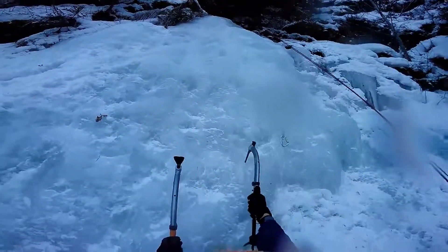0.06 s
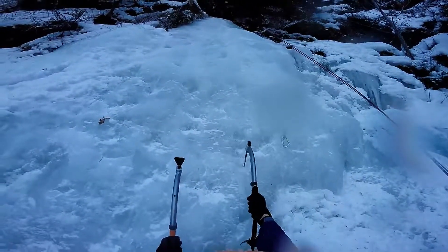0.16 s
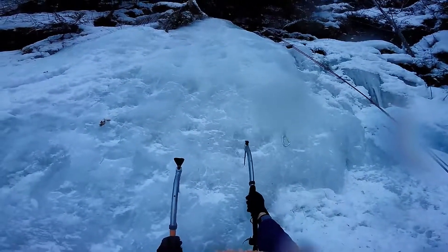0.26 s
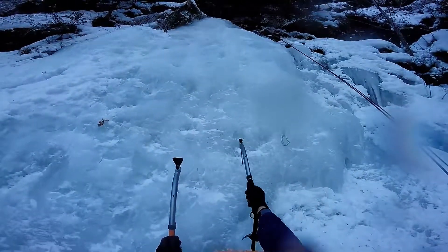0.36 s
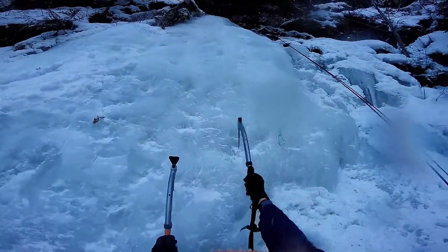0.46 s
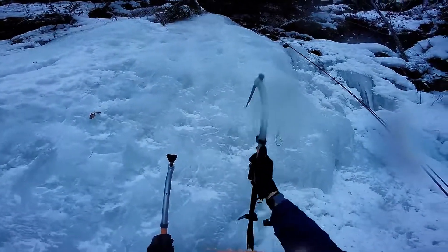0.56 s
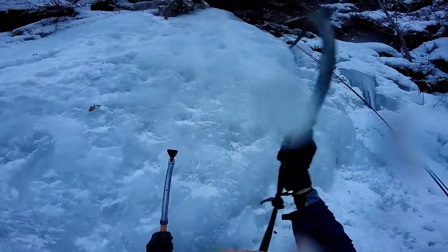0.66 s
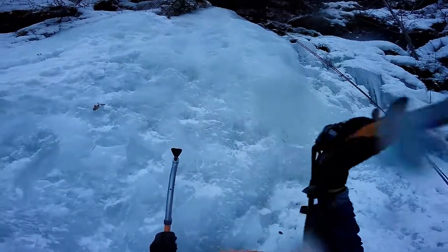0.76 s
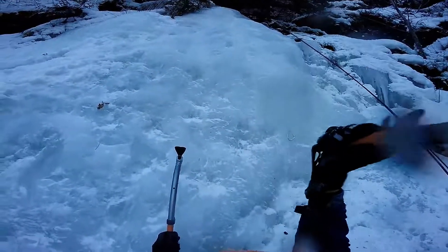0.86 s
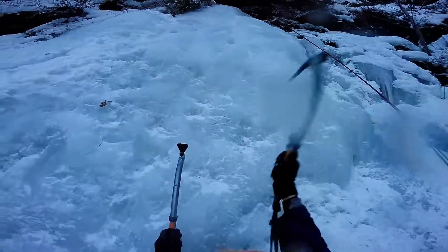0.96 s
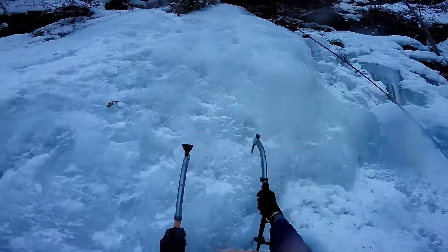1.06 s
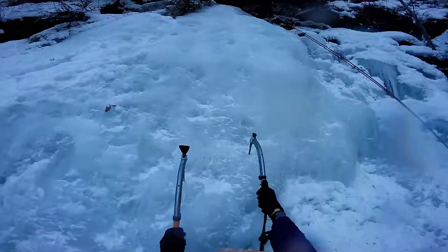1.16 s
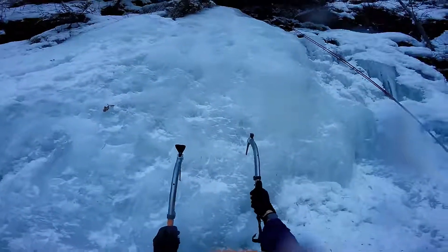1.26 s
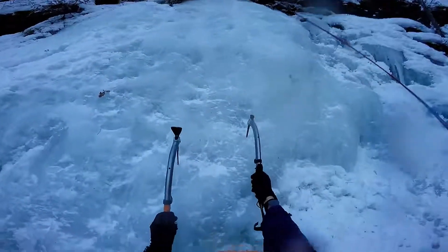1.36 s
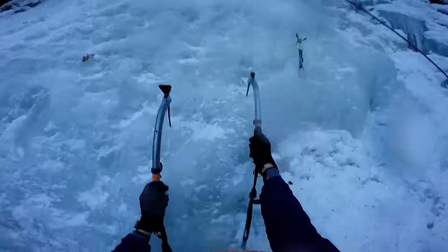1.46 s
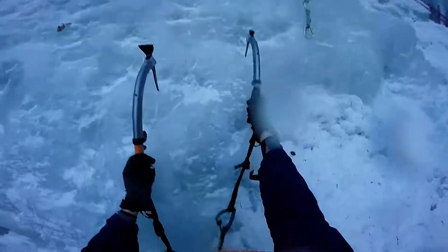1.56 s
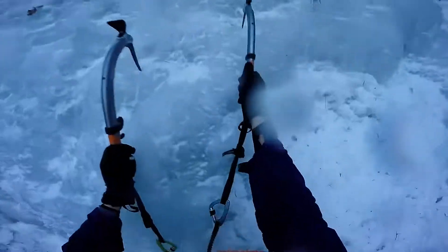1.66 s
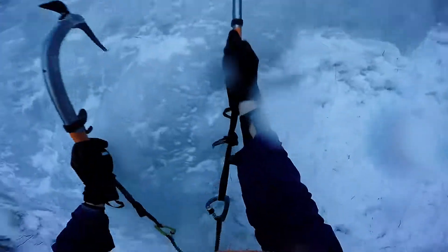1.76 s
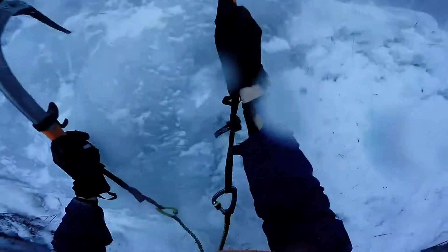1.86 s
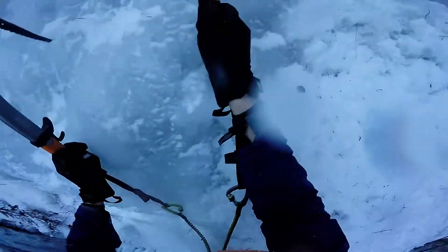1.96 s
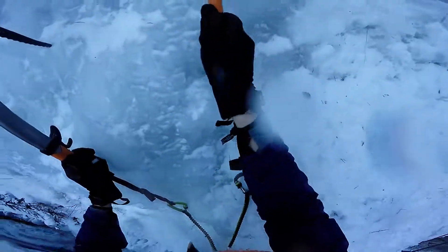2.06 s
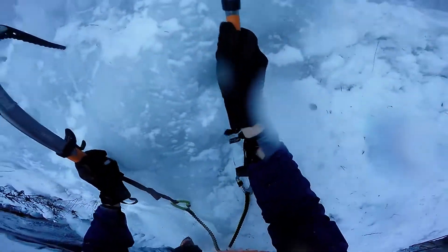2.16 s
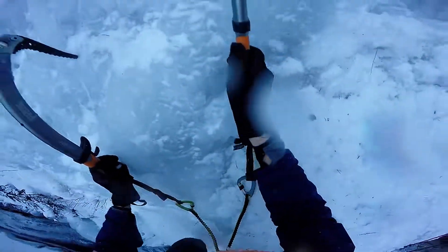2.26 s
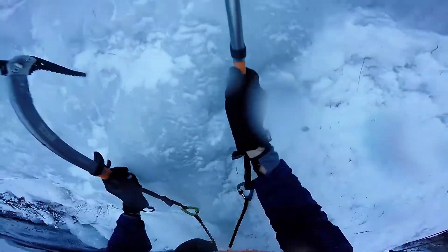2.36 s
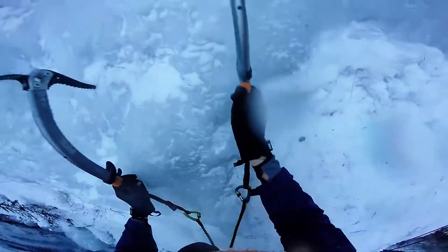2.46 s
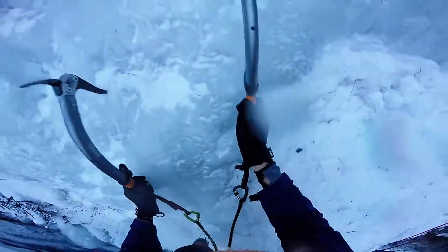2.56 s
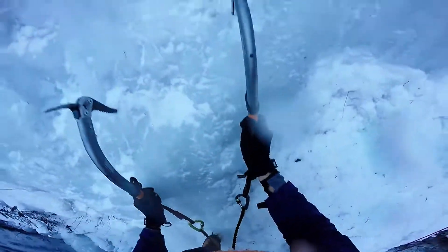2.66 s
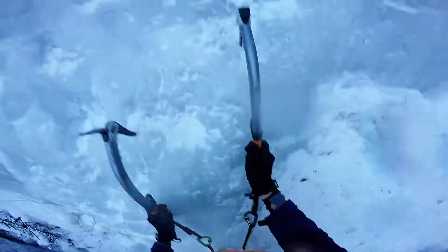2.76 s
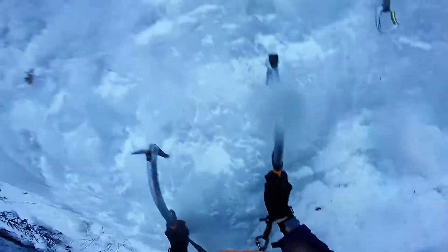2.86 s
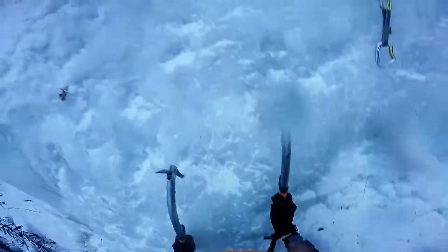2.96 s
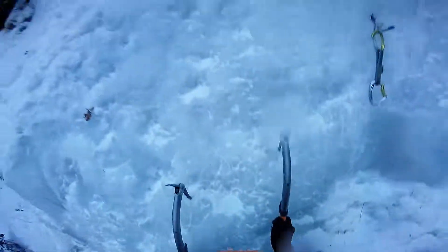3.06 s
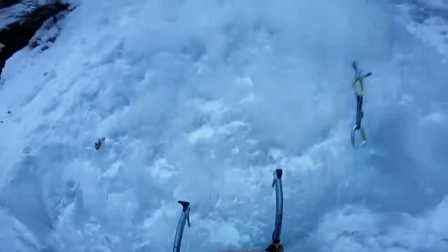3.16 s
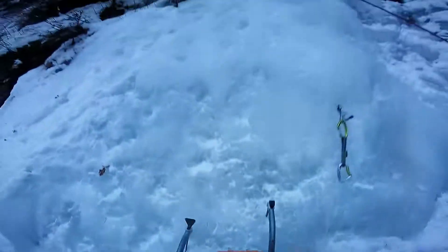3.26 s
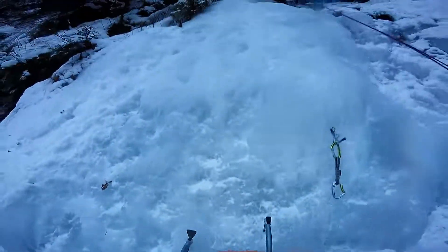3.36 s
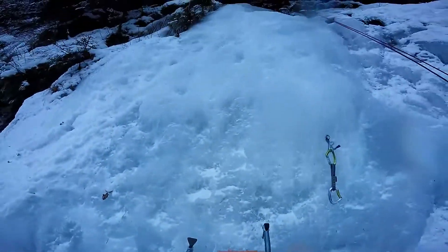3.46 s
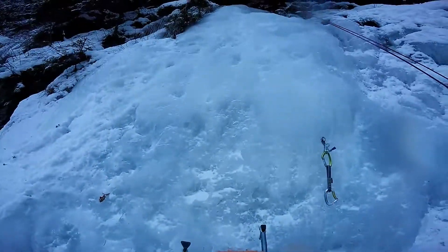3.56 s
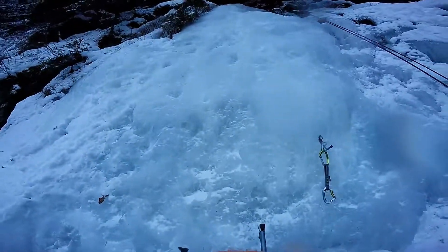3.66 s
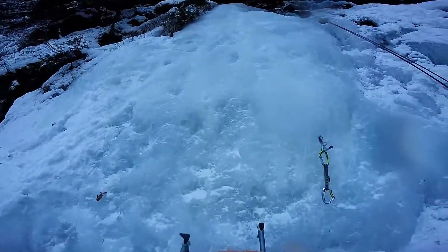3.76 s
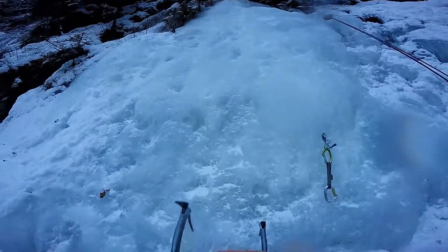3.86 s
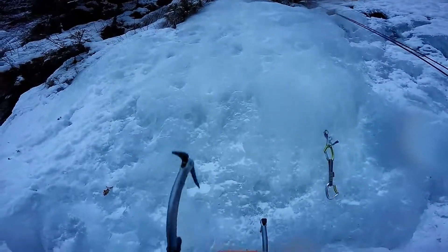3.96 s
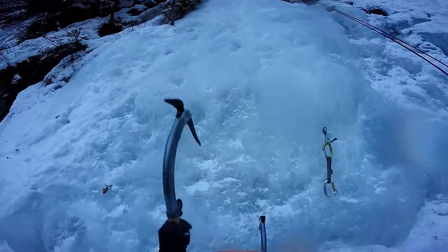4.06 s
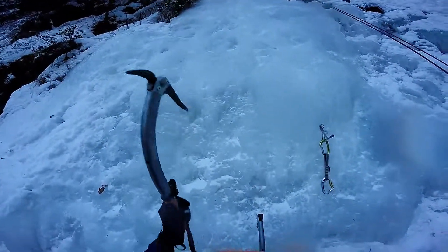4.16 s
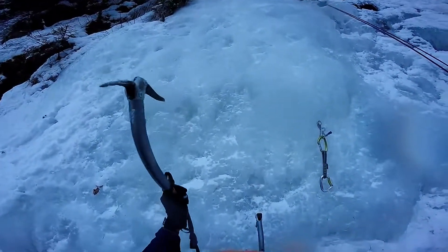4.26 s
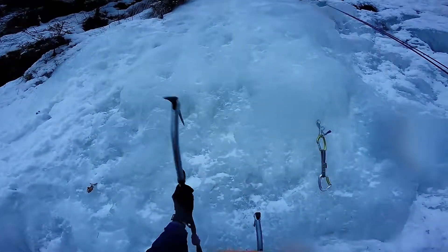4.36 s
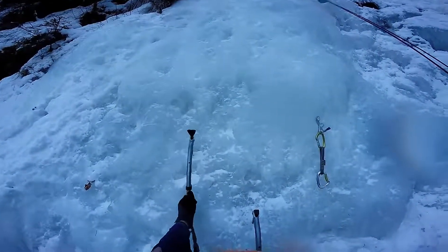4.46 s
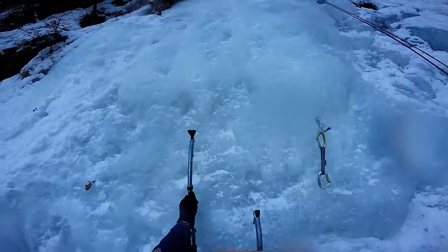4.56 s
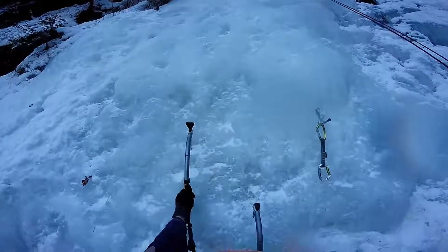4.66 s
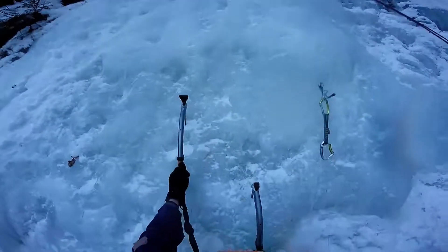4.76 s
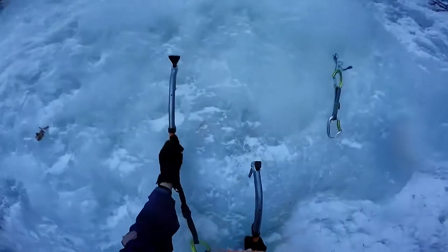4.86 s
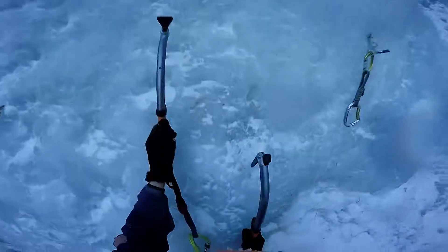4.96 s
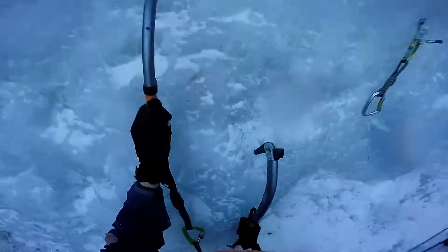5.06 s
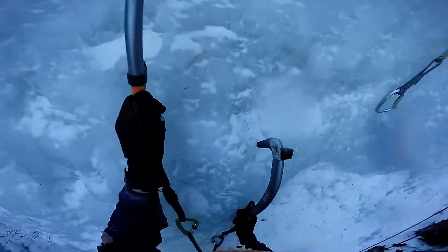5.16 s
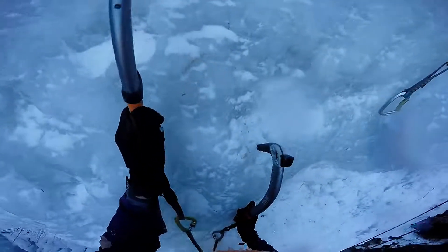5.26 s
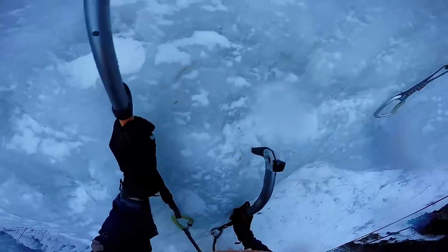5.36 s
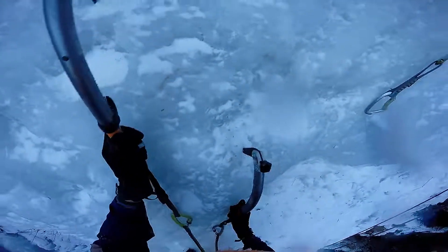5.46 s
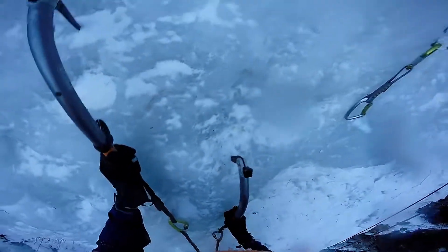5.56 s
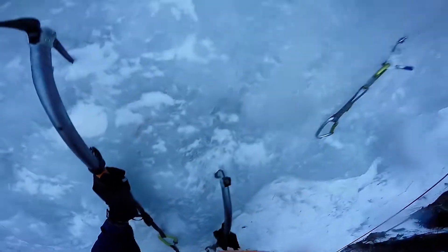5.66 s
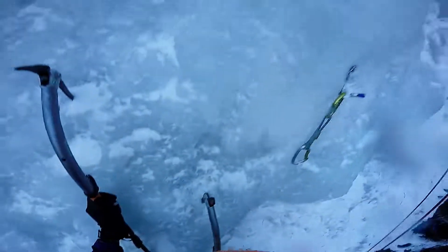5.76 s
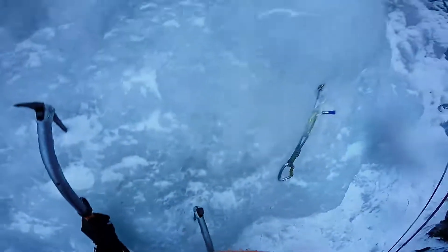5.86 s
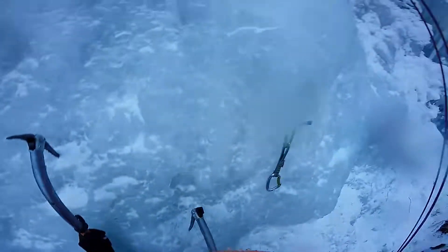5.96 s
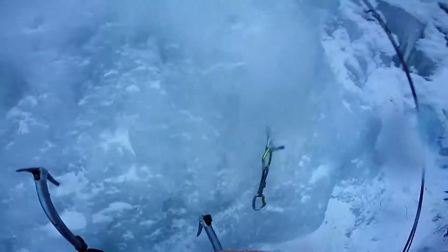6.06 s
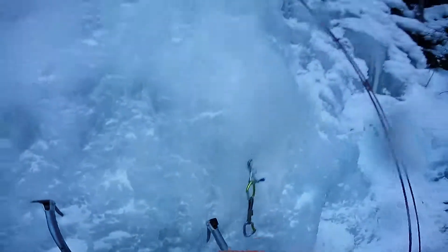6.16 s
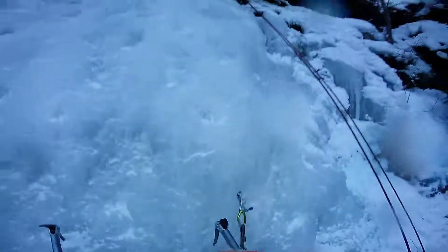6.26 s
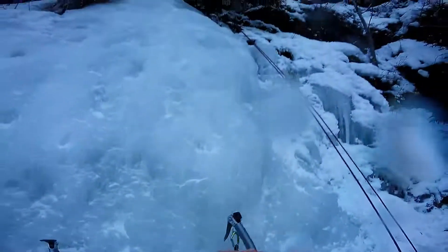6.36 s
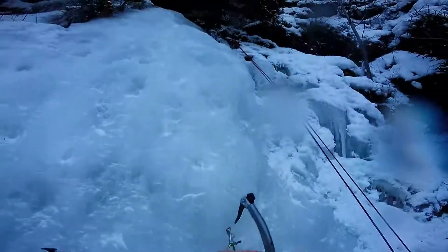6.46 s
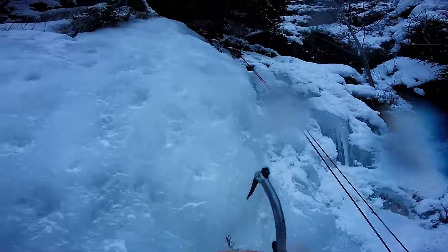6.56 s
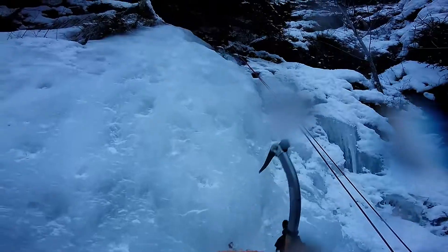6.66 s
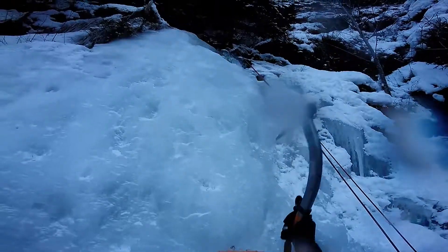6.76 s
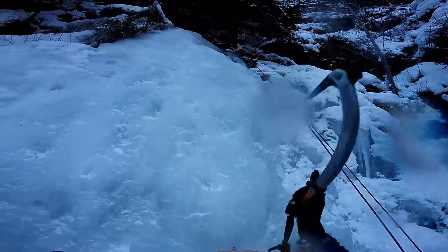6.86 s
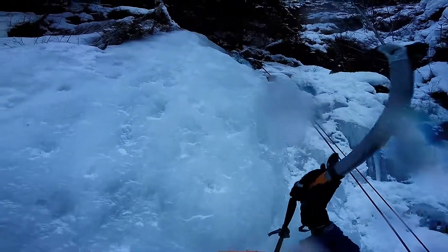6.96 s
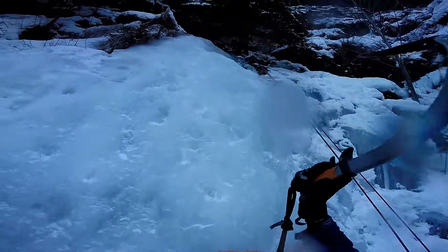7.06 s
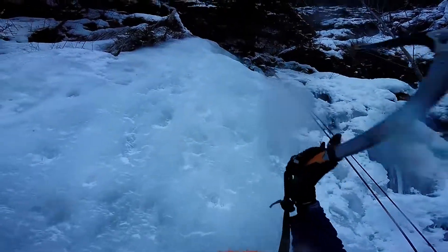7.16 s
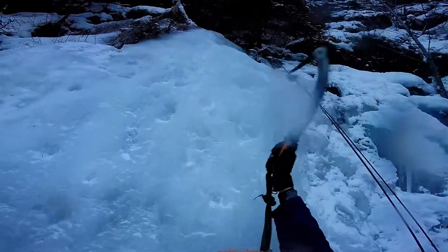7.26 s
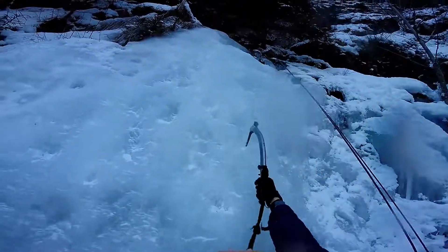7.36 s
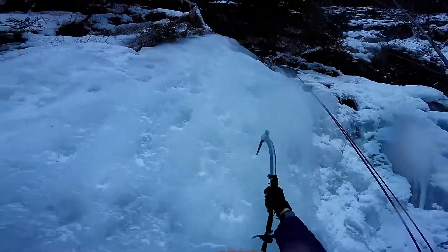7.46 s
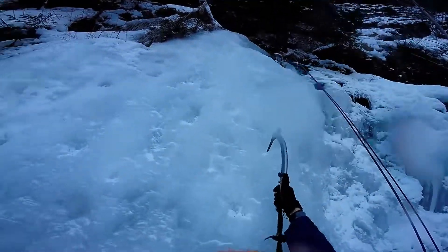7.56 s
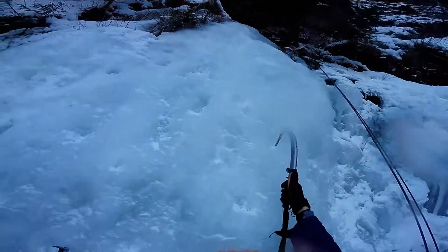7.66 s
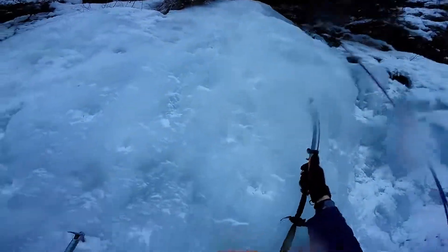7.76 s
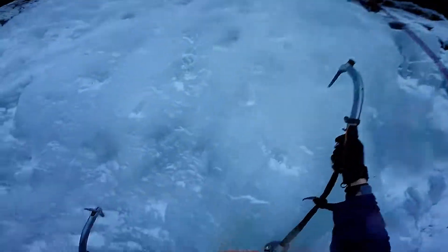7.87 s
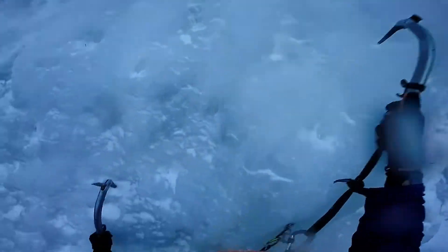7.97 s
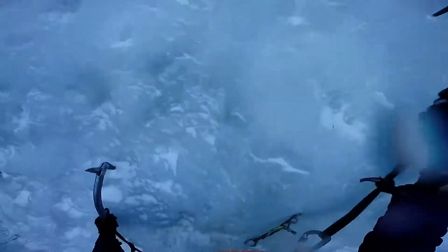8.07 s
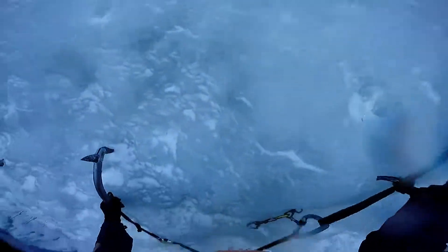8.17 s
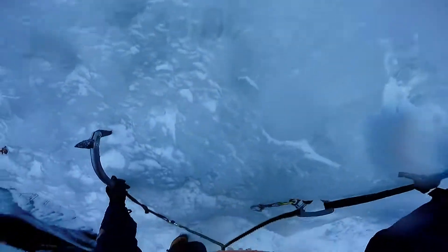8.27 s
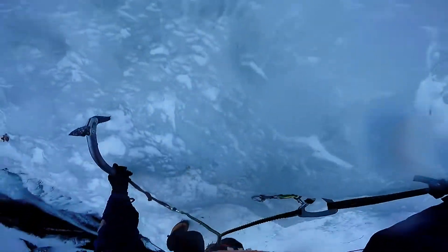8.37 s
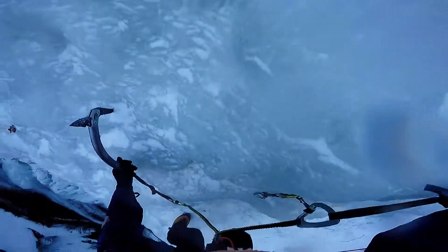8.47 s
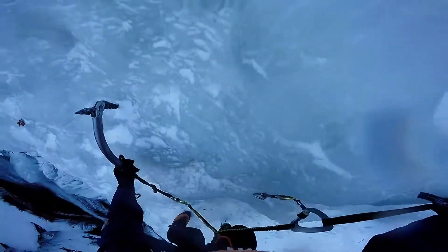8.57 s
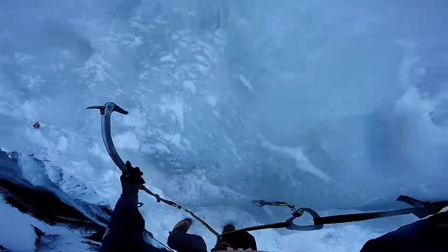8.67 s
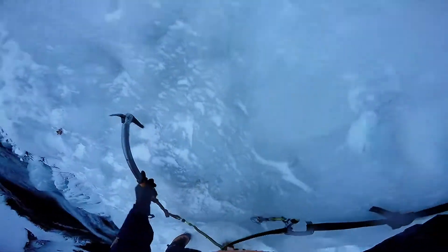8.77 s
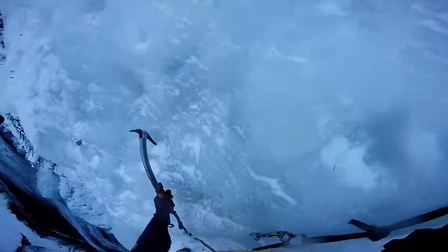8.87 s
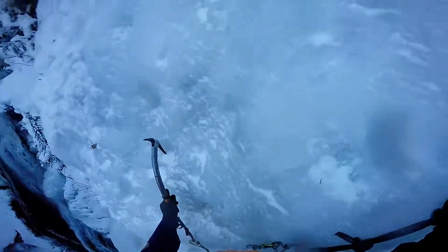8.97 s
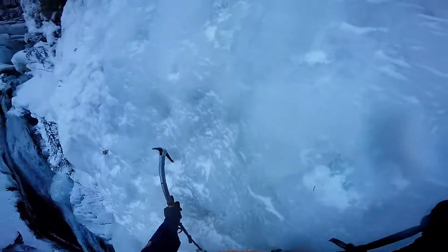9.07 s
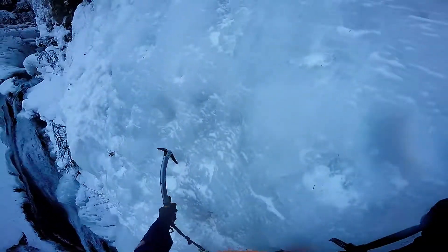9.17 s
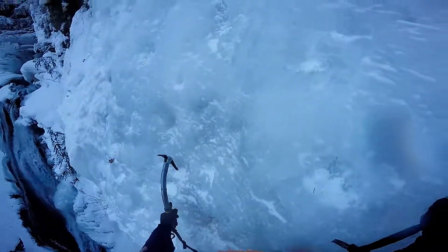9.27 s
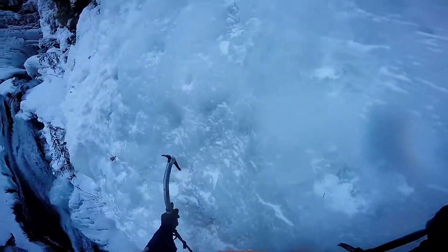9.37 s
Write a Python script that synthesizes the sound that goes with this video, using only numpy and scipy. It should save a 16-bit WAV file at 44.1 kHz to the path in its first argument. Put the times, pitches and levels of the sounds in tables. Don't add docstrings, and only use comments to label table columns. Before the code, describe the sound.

Close, crunchy pick strikes on a frozen waterfall, with a constant muffled hiss, deep body thumps, dull helmet knocks and brief metallic clinks.

```python
import sys
import numpy as np
from scipy import signal
from scipy.fft import rfft, irfft, next_fast_len
from scipy.io import wavfile
from scipy.ndimage import uniform_filter1d, map_coordinates

SR = 44100
rng = np.random.default_rng(int(sys.argv[2]) if len(sys.argv) > 2 else 0)


def inscribe(sig):
    pcm = np.round(np.clip(np.atleast_2d(sig).T, -1, 1) * 32767)
    wavfile.write(sys.argv[1], SR, pcm.astype(np.int16))


def nominal_scale(level):
    x = np.asarray(level, float) / 20
    return 10 ** x


N = 414981


def unit(x):
    return x / np.sqrt(np.mean(x ** 2) + 1e-20)


def along(points, hz):
    f, value = np.transpose(points)
    return np.interp(np.log(hz + 1), np.log(f + 1), value)


def curves(rows):
    times, *columns = np.transpose(rows)
    return [np.interp(np.arange(N) / SR, times, column) for column in columns]


def wobble(rate):
    knots = rng.standard_normal(int(N * rate / SR) + 4)
    return map_coordinates(knots, [np.arange(N) * rate / SR])


def filtered(x, response):
    size = next_fast_len(len(x) + 8192)
    spectrum = rfft(x, size) * response(np.fft.rfftfreq(size, 1 / SR))
    return irfft(spectrum, size)[:len(x)]


def resonances(modes):
    def response(f):
        total = 0
        for k, (hz, width, db) in enumerate(modes):
            damping = 1j * f * width
            total = total + (-1) ** k * nominal_scale(db) * damping / (hz * hz - f * f + damping)
        return total
    return response


def rush(spectrum, patchy_db=0):
    x = rng.standard_normal(N)
    if patchy_db > 0:
        field = rng.standard_normal((257, N // 256 + 2))
        field = uniform_filter1d(field, size=6, axis=0)
        field = uniform_filter1d(field, size=10, axis=1)
        patches = signal.stft(x, nperseg=512)[2] * nominal_scale(patchy_db * unit(field))
        x = signal.istft(patches, nperseg=512)[1][:N]
    return unit(filtered(x, lambda hz: nominal_scale(along(spectrum, hz))))


def steady(x, span):
    size = int(span * SR)
    power = uniform_filter1d(uniform_filter1d(x * x, size), size)
    return x / np.sqrt(np.abs(power) + 0.024)


def burst(modes, rise, hold, t60, spiky, in_step=0):
    size = 4096 if rise + hold + t60 < 0.06 else 16384
    t, f = np.arange(size) / SR, np.fft.rfftfreq(size, 1 / SR)
    attack = np.clip(t / max(rise, 1e-4), 0, 1) ** 2
    shape = attack * nominal_scale(-60 * np.clip(t - rise - hold, 0, None) / t60)
    cracks = rfft(shape * rng.standard_normal(size) * nominal_scale(spiky * rng.standard_normal(size)))
    total = 0
    for k, (hz, width, db) in enumerate(modes):
        force = cracks
        if in_step and width < 600:
            swing = rfft(shape * np.sin(2 * np.pi * hz * t))
            force = cracks + in_step * np.sqrt(width / SR) * swing
        ring = force * resonances([(hz, 1.8 * width, 0)])(f) ** 2
        total = total + (-1) ** k * nominal_scale(db) * np.sqrt(width) * ring / np.linalg.norm(ring)
    x = irfft(total, size)
    return 0.41 * x / np.linalg.norm(x) * np.sqrt(np.sum(shape ** 2) + 0.0012 * SR)


def add(track, s, x):
    start = round(s * SR)
    start, x = max(start, 0), x[max(-start, 0):]
    track[start:start + len(x)] += x[:len(track) - start]


# (time [s], tilt [0 up - 1 down], turn [-1 left - 1 right], faces water [0-1])
HEAD_AIM = [(0, 0.0089, 0.14, 1), (1.3, 0.04, 0.11, 0.8), (1.6, 0.07, 0, 0.6), (1.95, 0.87, 0.18, 0.58),
            (2.4, 1, 0.13, 0.97), (3.0, 0.97, 0.12, 0.6), (3.4, 0, -0.43, 0.26), (4.7, 0.027, -0.5, 0.05),
            (5.1, 0.59, 0.068, 0.37), (5.6, 1, -0.52, 0.3), (5.95, 0.43, 0, 0), (6.3, 0.016, .7, 0.4),
            (6.7, 0.083, 1, 0.78), (7.55, 0.019, 0.88, 0.93), (8.0, 0, -0.13, 0.7),
            (8.35, 0.95, 0.052, 0.82), (8.9, 0.71, -0.73, 0.93), (9.41, 0.88, -0.93, 0.84)]
# (frequency [Hz], level [dB per Hz])
LOW_HISS = [(60, -72), (90, -5.5), (140, -12.5), (340, -19.5), (750, -19), (1100, -10)]
HEAD_UP_HISS = [(1500, -4.5), (1700, -5.5), (1950, 1.85), (2350, -7), (2650, -4), (3200, -8), (3900, -8),
                (4800, -14.5), (5400, -13.5), (6200, -19), (8100, -16.5), (8800, -20), (10900, -24),
                (11500, -26.5), (15300, -31.5)]
HEAD_DOWN_HISS = [(1500, -5), (2000, -5), (2400, -5), (2800, -2.5), (3400, -11.5), (3900, -11),
                  (4300, -13.5), (5200, -12), (6100, -20), (7600, -13), (8100, -13.5), (8700, -22.5),
                  (10500, -24), (15300, -33)]
# (frequency [Hz], width [Hz], level [dB])
HOUSING_AIR = [(512, 31, 7), (12700, 1200, 2), (14300, 540, 5)]
# (frequency [Hz], level [dB])
TURNED_RIGHT = [(1500, 0), (3000, 0), (4800, -1.5), (6500, 0), (8900, -2), (9800, 1.5), (11500, -2),
                (14300, -2)]
TURNED_LEFT = [(1500, -1), (3000, -0.5), (5500, 2), (7000, 2.5), (9500, -4), (11000, 2), (13000, -1.5),
               (14500, 1.5)]
FACING_AWAY = [(1500, -0.5), (4300, 0.34), (5200, -2.5), (8100, -2), (8900, 2.5), (10000, 1), (11500, -0.8),
               (13500, 2), (15000, 1.5)]


def stream():
    down, turn, facing = curves(HEAD_AIM)
    right, left = np.clip(turn, 0, 1), np.clip(-turn, 0, 1)

    up_hiss = rush(LOW_HISS + HEAD_UP_HISS, patchy_db=0.3)
    down_hiss = rush(LOW_HISS + HEAD_DOWN_HISS, patchy_db=1.2)
    hiss = np.sqrt(1 - down) * up_hiss + nominal_scale(-0.58) * np.sqrt(down) * down_hiss

    def housing(f):
        gain = 1
        for hz, width, db in HOUSING_AIR:
            gain = gain + (nominal_scale(db) - 1) * np.abs(resonances([(hz, width, 0)])(f)) ** 2
        return gain

    hiss = filtered(hiss, housing)
    for share, colour in [(right, TURNED_RIGHT), (left, TURNED_LEFT), (1 - facing, FACING_AWAY)]:
        coloured = filtered(hiss, lambda f: nominal_scale(along(colour, f)))
        hiss = (1 - share) * hiss + share * coloured

    mid = rush([(1900, -120), (2300, -14), (2750, 0), (3200, -10), (3700, -120)], patchy_db=1.2)
    whistle = rush([(6000, -120), (6450, -21), (6900, -4), (7400, -16), (8000, -120)])
    sizzle = rush([(8200, -120), (8900, -7.5), (9650, 0.5), (10100, -4.5), (10800, -120)], patchy_db=2)
    edge = rush([(9600, -120), (10100, -3), (10800, 4), (11200, -6), (11800, -120)])
    bands = nominal_scale(-68.5 + 5 * down + 12 * facing + 9 * left) * mid
    bands += nominal_scale(-86.5 + 24 * facing + 4.2 * right) * whistle
    bands += nominal_scale(-62.5 + 1.6 * down - 18 * right) * sizzle
    bands += nominal_scale(-68) * (1 - down) * edge

    hiss *= nominal_scale(-46.5 - 1.5 * down + 1.78 * facing)
    flicker = nominal_scale(0.33 * wobble(7) + 0.63 * wobble(40))
    return flicker * (hiss + bands)


# (time [s], effort [dB])
BODY_EFFORT = [(0, -28.5), (1.0, -35.5), (1.45, -35), (1.7, -27.5), (2.2, -26.5), (2.75, -37.5),
               (3.6, -35.5), (4.0, -45.5), (4.5, -36), (5.5, -36.5), (6.1, -42), (6.75, -43), (7.25, -35.5),
               (8.2, -35), (8.65, -46)]
# (time [s], rumble [dB], shudder [dB], length [s])
BODY_LURCHES = [(0.118, -28, -27, 0.056), (1.22, -21, -37, 0.083), (1.955, -43, -34, 0.052),
                (2.618, -37.5, -34.5, 0.12), (3.3, -46, -39.5, 0.084), (3.862, -31, -40, 0.026),
                (4.587, -31.5, -38, 0.031), (5.163, -26.5, -33, 0.047), (5.835, -34.5, -45, 0.033),
                (6.407, -51, -39.5, 0.069), (7.52, -36, -40, 0.043), (8.45, -50, -42.5, 0.12),
                (8.822, -37, -48, 0.074), (9.05, -43, -42.5, 0.13)]
# (frequency [Hz], level [dB per Hz])
RUMBLE_SPECTRUM = [(5, -120), (8, -14), (11, 11), (22, -1.5), (35, 1.5), (48, -13), (70, -28), (110, -120)]
SHUDDER_SPECTRUM = [(30, -120), (42, -9), (52, -1.5), (64, -2.5), (80, -22), (100, -35), (220, -38.5),
                    (400, -120)]


def sway():
    end_db = -36.5
    effort_db, = curves(BODY_EFFORT + [(N / SR, end_db)])
    rumble = nominal_scale(effort_db + 2.6 * wobble(6))
    shudder = nominal_scale(-48 + effort_db - end_db + 1.65 * wobble(5))
    t = np.arange(-SR // 4, SR // 4) / SR
    for s, rumble_db, shudder_db, length in BODY_LURCHES:
        swell = np.exp(-(t / length) ** 2)
        add(rumble, s + t[0], nominal_scale(rumble_db) * swell)
        add(shudder, s + t[0], nominal_scale(shudder_db) * swell)
    lumps = steady(rush(RUMBLE_SPECTRUM), span=0.082)
    shakes = unit(nominal_scale(3 * wobble(25)) * steady(rush(SHUDDER_SPECTRUM), span=0.11))
    return rumble * lumps + shudder * shakes


# (time [s], peak [dB], direction [-1 or 1], width [s])
HEAD_JOLTS = [(.07, -14.5, -1, 0.021), (.134, -9, -1, 0.011), (1.141, -22, -1, 0.0094),
              (1.179, -12, -1, 0.0088), (1.236, -7.5, -1, 0.011), (1.936, -11, 1, 0.011),
              (1.974, -13.5, -1, 0.0099), (2.015, -15, 1, 0.0082), (2.259, -19, 1, 0.0091),
              (2.292, -22, -1, 0.013), (2.343, -31, 1, 0.012), (2.378, -23, 1, 0.0088),
              (2.429, -18, 1, 0.008), (2.852, -26, -1, 0.015), (3.066, -25, -1, .008),
              (3.255, -30, 1, 0.0091), (4.583, -28, -1, 0.009), (4.64, -22.5, -1, 0.018),
              (5.148, -19, 1, 0.011), (5.161, -22, -1, 0.0085), (5.179, -27, -1, .007),
              (7.486, -18.5, -1, 0.0083), (7.523, -20.5, -1, 0.021), (7.588, -18.5, -1, 0.011),
              (8.147, -20.5, -1, 0.024), (8.822, -25, 1, 0.011)]


def jolts():
    out, t = np.zeros(N), np.arange(-SR // 20, SR // 20) / SR
    for s, db, direction, width in HEAD_JOLTS:
        u = t / (0.5 * width)
        push = 1.3 * np.exp(-u * u / 2) - 0.33 * np.exp(-u * u / 12)
        add(out, s + t[0], direction * nominal_scale(db) * push)
    return out


# (time [s], peak [dB], frequency [Hz], length [s])
CLOTH_RUBS = [
    (1.865, -34.5, 1380, 0.013),
    (1.888, -32, 1370, 0.028),
    (3.258, -35.5, 1450, 0.025),
    (3.295, -40, 1500, 0.07),
    (5.123, -37, 1480, 0.062),
    (5.719, -36.5, 1390, 0.064),
    (6.28, -42, 1450, 0.14),
    (8.187, -27, 1450, 0.018),
]
# (time [s], peak [dB], frequency [Hz])
CLOTH_BUMPS = [(0.751, -50, 205), (2.898, -49, 210), (3.414, -52, 203), (3.504, -51, 167),
               (3.977, -48.5, 200), (7.049, -53, 153), (7.118, -44, 158), (7.29, -44.5, 153),
               (7.556, -47.5, 210), (8.75, -46, 148), (9.091, -46.5, 174), (9.295, -45, 143)]


def rubs():
    out = np.zeros(N)
    for s, db, hz, length in CLOTH_RUBS:
        modes = [(hz, 220, 0), (1.09 * hz, 1200, -12)]
        add(out, s, nominal_scale(db) * burst(modes, 0.15 * length, 0.5 * length, length, spiky=4.9, in_step=1.6))
    for s, db, hz in CLOTH_BUMPS:
        modes = [(hz, 70, 0), (hz, 200, -9)]
        add(out, s - 0.004, nominal_scale(db + 2) * burst(modes, 0.0041, 0.0053, 0.028, spiky=2.8))
    return out


# (time [s], peak [dB], shell ring [dB], bright part [dB])
HELMET_KNOCKS = [(0.091, -34.5, -24, -1), (1.2, -32.5, -14.5, -6), (1.675, -36.5, -23, -3.5),
                 (1.873, -37, -19, -4), (2.074, -36.5, -5.5, -5), (2.23, -40.5, -6, -2),
                 (2.406, -41, -3, -12), (2.442, -35.5, -18, -3), (2.489, -29.5, -7, -2.5),
                 (2.536, -38.5, -14, -3), (2.579, -28.5, -10, -0.5), (2.772, -44, -21, 1),
                 (3.052, -31, -11, -2), (3.127, -37, -4, -5), (3.243, -38, -11, -4), (3.341, -44.5, 2, 0),
                 (4.726, -44, -8, -6), (5.423, -47, -28, -2), (5.782, -33, -9.5, -3.5),
                 (5.844, -38.5, -7, -4), (5.862, -48, 5.5, 7.5), (5.984, -39.5, -3, -19),
                 (6.205, -34.5, -14, -1), (7.586, -50, -14, 11.5), (8.381, -38.5, -30, 0.5),
                 (9.159, -43.5, -4, -13)]
# (frequency [Hz], width [Hz], level [dB])
SHELL_LOW = [(203, 58, 1.5), (530, 58, 0), (1008, 240, -1), (704, 1300, -26)]
SHELL_BRIGHT = [(1450, 180, 20.5), (1750, 350, 8.5), (2800, 530, 8), (4630, 1500, -5)]


def knocks():
    out, t = np.zeros(N), np.arange(SR // 3) / SR
    contact = 0.0055
    ring = np.sin(2 * np.pi * 137 * t) * nominal_scale(-60 * t / 0.33) * (1 - np.exp(-t / 0.0023))
    for s, db, ring_db, bright_db in HELMET_KNOCKS:
        dull = burst(SHELL_LOW, 0.00055, contact, 0.031, spiky=1.6)
        bright = burst(SHELL_BRIGHT, 0.0021, contact, 0.021, spiky=4.2)
        add(out, s - 0.002, nominal_scale(db - 0.5) * dull)
        add(out, s - 0.002, nominal_scale(db + bright_db + 4) * bright)
        add(out, s, nominal_scale(db + ring_db - 0.5) * ring)
    return out


# (time [s], peak [dB], main pitch [Hz], treble [dB], treble pitch [Hz])
ICE_CHIPS = [(.109, -39, 3000, -2, 7000), (0.3526, -29.5, 3050, -18, 4390), (0.612, -26, 2750, -13, 4410),
             (1.176, -50, 7500, 6, 7500), (1.505, -55, 9000, 12, 13800), (1.855, -38, 2400, -12, 4000),
             (2.6334, -42, 2800, 2, 7600), (2.7636, -30.5, 2780, -11, 7900), (3.348, -32, 2500, -8, 8000),
             (5.4246, -25.5, 2780, -7.5, 6900), (7.546, -25, 1780, -11, 3790),
             (8.286, -56, 9000, 11, 13000), (8.722, -36, 2700, -7, 7500), (3.053, -36, 4650, -8, 4200)]


def chips():
    out = np.zeros(N)
    for s, db, hz, treble_db, treble_hz in ICE_CHIPS:
        body = [(hz, 350, 0), (1.1 * hz, 2000, -18)]
        spray = [(treble_hz, 350, 0), (7500, 5000, -20), (13000, 5000, -25)]
        add(out, s - 0.001, nominal_scale(db - 2.5) * burst(body, 0.00061, 0.00069, 0.024, spiky=4.6))
        add(out, s - 0.001, nominal_scale(db + treble_db) * burst(spray, 0.00056, 0.001, 0.02, spiky=5))
    return out


# (time [s], peak [dB], t60 [s], favoured mode [Hz])
CARABINER_CLINKS = [
    (.253, -31.5, .02, 7800),
    (.268, -35, .02, 4630),
    (0.5577, -27, 0.0099, 8000),
]
# (frequency [Hz], level [dB])
ALLOY_MODES = [(2800, 6), (4600, -8), (7800, -16), (10200, -24), (14800, -33)]


def clinks():
    out = np.zeros(N)
    for s, db, t60, top_hz in CARABINER_CLINKS:
        modes = []
        for hz, level in ALLOY_MODES:
            modes.append((hz * (1 + 0.036 * rng.normal()), 0.1 * hz, level + rng.normal(0, 3.2)))
        modes += [(top_hz, 250, 0), (8000, 7000, -24)]
        add(out, s - 0.001, nominal_scale(db) * burst(modes, 0.00087, 0.0014, t60, spiky=3))
    return out


# (time [s], peak [dB], contact [s], t60 [s])
ICE_TAPS = [(0.0933, -24, .001, .012), (1.181, -27.5, .003, .014), (1.199, -24.5, .001, .009),
            (1.206, -19, 0.0017, .012), (1.284, -30.5, .001, .008), (1.838, -29, .001, .008),
            (2.23, -25.5, 0.0011, 0.014), (2.277, -27.5, 0.0017, 0.018), (4.611, -25, 0.0017, .013),
            (7.886, -21, .002, 0.014), (8.0557, -23, .002, .011), (8.077, -27.5, .003, 0.011),
            (8.104, -27, 0.0027, .012), (8.143, -29.5, .002, .01), (8.184, -21, .001, .009),
            (8.197, -23.5, 0.00036, 0.0042), (0.2137, -29, .001, .009), (.218, -29.5, 0.0018, .01),
            (0.2957, -27.5, .001, .008), (.299, -27.5, 0.0028, .016)]
# (frequency [Hz],
# width [Hz], level [dB])
FIRST_TAP_RINGS = [
    [(1630, 320, 2), (2560, 330, -7), (4720, 280, -11), (6730, 230, -22), (10200, 870, -21)],
    [(1780, 270, -1), (2530, 200, 1), (4070, 220, -8), (6880, 230, -20)],
    [(1670, 720, -3), (5400, 300, -14), (7230, 580, -24), (10200, 380, -13)],
    [(1570, 490, -5.5), (2470, 210, -2), (3000, 160, -7), (4100, 510, -14), (5300, 220, -14),
     (6660, 240, -13), (9250, 250, -23)],
    [(1810, 430, 0), (3980, 280, -11), (6770, 360, -17), (10400, 1120, -18)],
    [(2870, 390, 7), (4930, 250, -18)],
    [(1390, 270, 8), (2430, 240, -9), (4700, 230, -21)],
    [(2880, 300, 0), (4000, 300, 1.5), (6370, 310, -9), (9450, 400, -16), (13700, 300, -22)],
    [(2920, 250, 1), (4730, 710, -6), (5850, 200, -11), (9000, 200, -10), (10000, 240, -20)],
    [(1620, 300, 3.5), (2500, 220, -9), (4090, 440, -14), (4700, 300, -10), (7010, 290, -25),
     (8660, 230, -24), (10400, 570, -21)],
]
NEXT_TAP_RINGS = [
    [(1540, 350, 0), (2440, 230, 0), (3010, 220, -16), (3800, 530, -13), (5380, 240, -18), (6850, 320, -18)],
    [(2460, 270, 0), (2940, 250, -7), (4030, 250, -7), (4660, 280, -9), (5380, 250, -19), (6800, 350, -12),
     (9710, 260, -19)],
    [(1660, 250, 3), (2500, 270, -7), (7070, 310, -14), (8530, 240, -23), (9650, 210, -25)],
    [(1640, 270, 1), (2310, 200, -3), (3840, 460, -2), (5300, 300, -7), (6840, 340, -10)],
    [(1370, 240, 2), (2010, 290, -19), (4570, 240, 1.5), (6990, 320, -5), (9750, 390, -18)],
    [(1610, 510, 3), (3480, 500, -13), (5500, 1400, -11), (7000, 1200, -5), (8880, 740, -6),
     (10400, 900, -13), (13000, 2000, -24)],
    [(2910, 490, 1), (4660, 500, 3), (6200, 1500, -9), (9600, 700, -12), (8000, 520, 0), (11600, 620, -19)],
    [(3030, 350, 0), (4640, 430, -1), (6300, 1200, -12), (7980, 350, -3), (9740, 230, -19)],
    [(2790, 560, -6), (4700, 540, 2), (6800, 570, -3), (8650, 620, -6), (10300, 490, -8)],
    [(2520, 200, 2), (4530, 230, -5), (6770, 240, -24), (7630, 290, -9)],
]


def taps():
    out = np.zeros(N)
    snap = [(1870, 1760, -15.5), (7000, 5000, -27.5), (13500, 4000, -33)]
    for (s, db, contact, t60), modes in zip(ICE_TAPS, FIRST_TAP_RINGS + NEXT_TAP_RINGS):
        rings = [(hz, 0.78 * width, level) for hz, width, level in modes] + snap
        add(out, s - 0.0004, nominal_scale(db + 1) * burst(rings, 0.00053, contact, t60, spiky=2.5, in_step=1.6))
    return out


# (time [s], peak [dB], rise [s], crushing [s], splinters [dB])
PICK_BLOWS = [
    (.002, -8, 0.0011, 0.0011, -13),
    (1.112, -6, 0.003, 0.002, -14),
    (4.5173, -9.5, 0.0018, 0.0044, -15.5),
    (7.45, -7, 0.0018, 0.0017, -16.5),
]
# (frequency [Hz], width [Hz], level [dB])
AXE_MODES = [
    [(1524, 260, 0), (2040, 300, -9), (2650, 330, 0), (3260, 370, -1), (4410, 230, -3), (5400, 180, -15),
     (6320, 380, -12), (8000, 370, -7), (10250, 500, -15.5)],
    [(1480, 200, 0), (2190, 150, -8), (2750, 300, -0.5), (3150, 420, -3), (3880, 250, -14.5),
     (4670, 300, -14), (5350, 300, -15), (6050, 410, -11), (7450, 440, -6), (8750, 300, -11.5),
     (10040, 500, -13), (13500, 3300, -32)],
    [(1696, 205, 0), (2630, 220, 6.5), (3030, 170, -0.5), (3380, 200, -3.5), (1970, 92, -5),
     (3740, 110, -12.5), (4470, 150, -3), (5200, 180, -10), (6530, 450, -10.5), (7800, 300, -19),
     (9200, 900, -28), (11900, 250, -34)],
    [(1356, 200, -11.5), (1700, 85, -7), (2390, 480, -10), (2920, 320, 3.5), (3280, 340, -3.5),
     (4160, 280, -13), (5050, 350, -18), (6040, 310, -8.5), (8000, 750, -16), (10470, 780, -21)],
]
# (blow [index], time [s], peak [dB])
ICE_RECRACKS = [(0, 0.01, -24), (1, 1.119, -20), (1, 1.124, -28), (2, 4.521, -6.5), (2, 4.5236, -8),
                (2, 4.53, -25), (3, 7.456, -14), (3, 7.461, -24)]


def axes():
    out = np.zeros(N)
    t60 = 0.018
    for (s, db, rise, hold, splinter_db), modes in zip(PICK_BLOWS, AXE_MODES):
        shaft = [(hz, 1.02 * width, level) for hz, width, level in modes if hz < 3600]
        splinters = [(hz, 1.3 * width, level) for hz, width, level in modes if hz >= 3600]
        splinters += [(5200, 1800, -25), (14100, 3600, -38)]
        thud = [(368, 130, 3), (930, 89, 1.6)]
        add(out, s, nominal_scale(db - 1.5) * burst(shaft, rise, hold, t60, spiky=2.7, in_step=1.8))
        add(out, s, nominal_scale(splinter_db) * burst(splinters, rise, hold, 0.95 * t60, spiky=3.3, in_step=1.5))
        add(out, s, nominal_scale(db - 29) * burst(thud, rise, hold, t60, spiky=0.93))
    for blow, s, db in ICE_RECRACKS:
        modes = AXE_MODES[round(blow)][:9]
        add(out, s, nominal_scale(db) * burst(modes, 0.00036, 0.00053, 0.0087, spiky=2.4, in_step=1.4))
    return filtered(out, lambda f: (1j * f / (250 + 1j * f)) ** 2)


def scene():
    background = stream() + sway() + jolts() + rubs()
    contacts = knocks() + chips() + clinks() + taps()
    return (background + contacts + axes())[None]


def roll_off(x):
    return signal.sosfilt(signal.butter(12, 16480, fs=SR, output="sos"), x)


def record(dry):
    band = [(3, -29), (9, 0), (15250, 0.5), (15450, -33), (16500, -40)]  # (frequency [Hz], level [dB])
    kept = filtered(dry[0], lambda hz: nominal_scale(along(band, hz)))
    return roll_off(kept[None])


dry = scene()
out = record(dry)
inscribe(out)
```